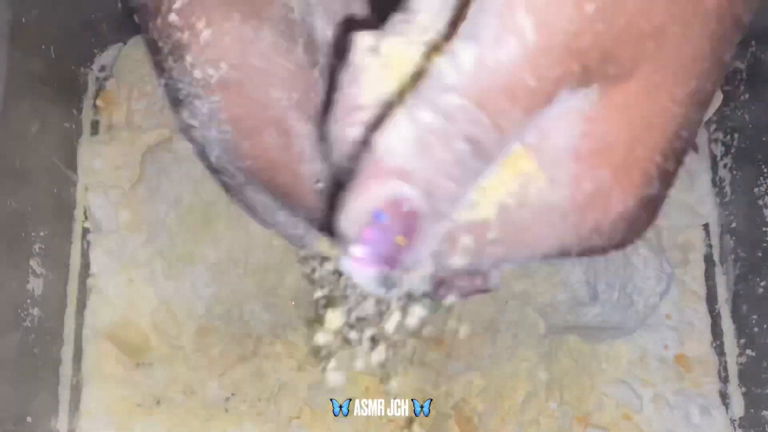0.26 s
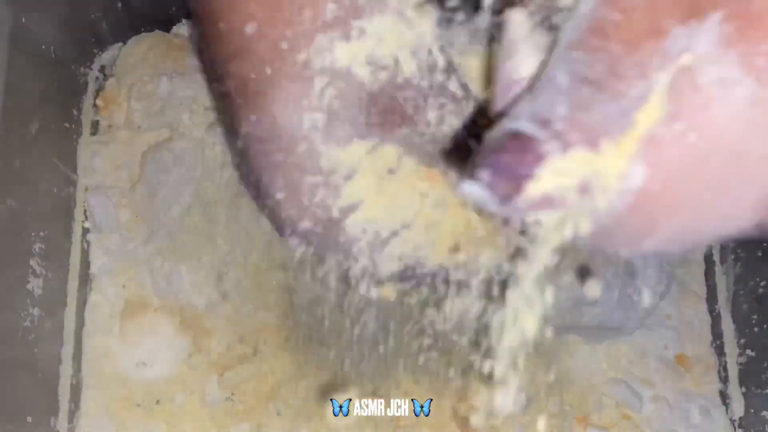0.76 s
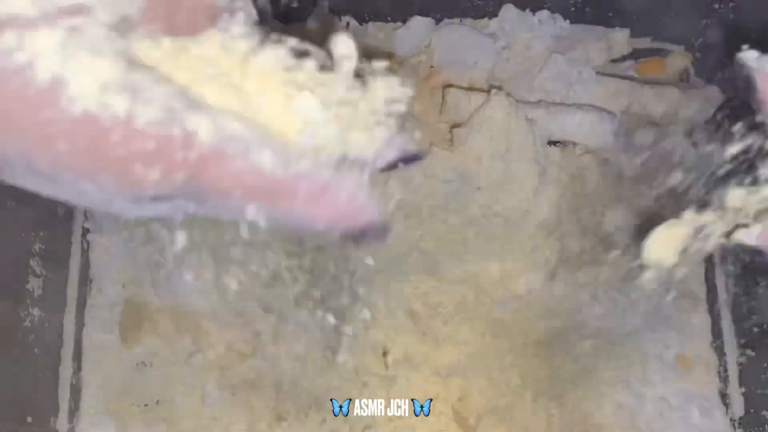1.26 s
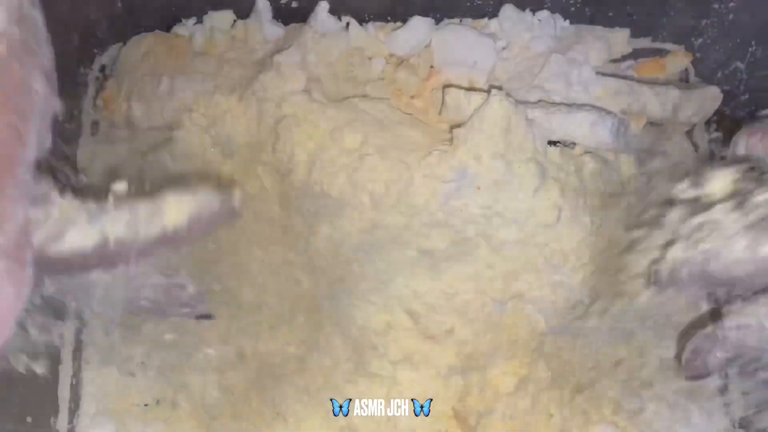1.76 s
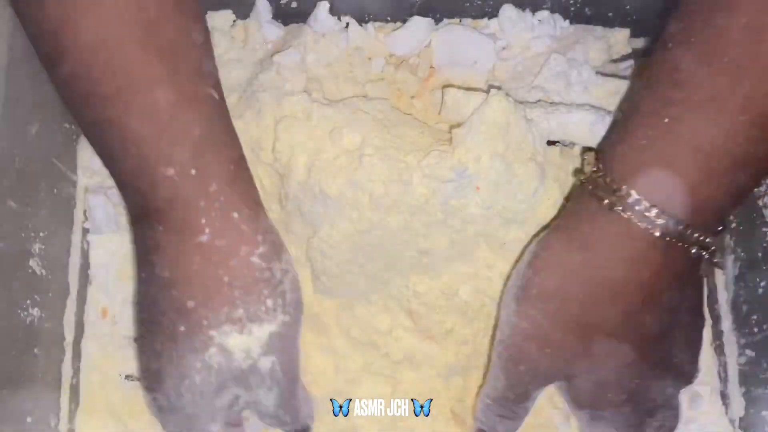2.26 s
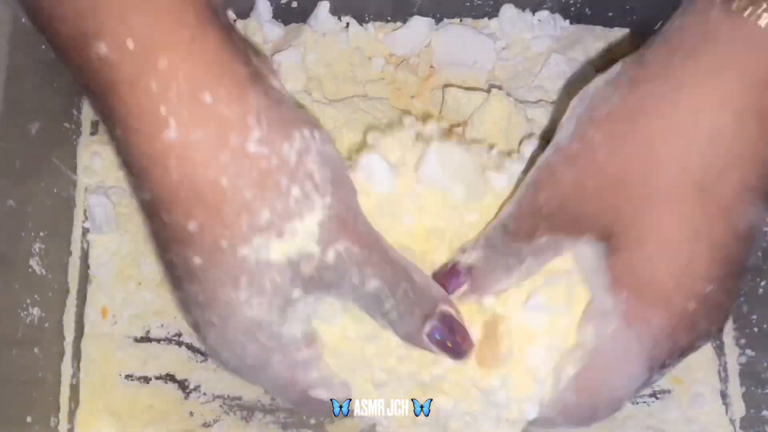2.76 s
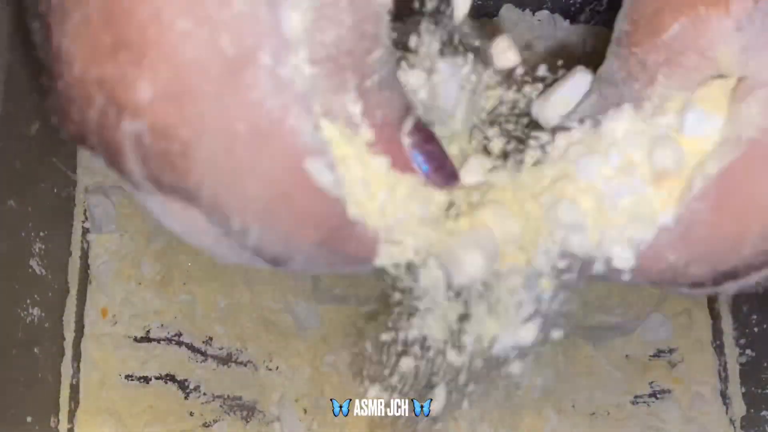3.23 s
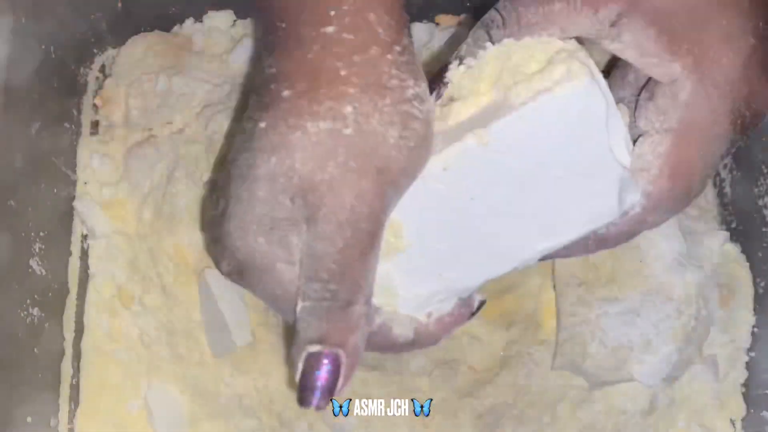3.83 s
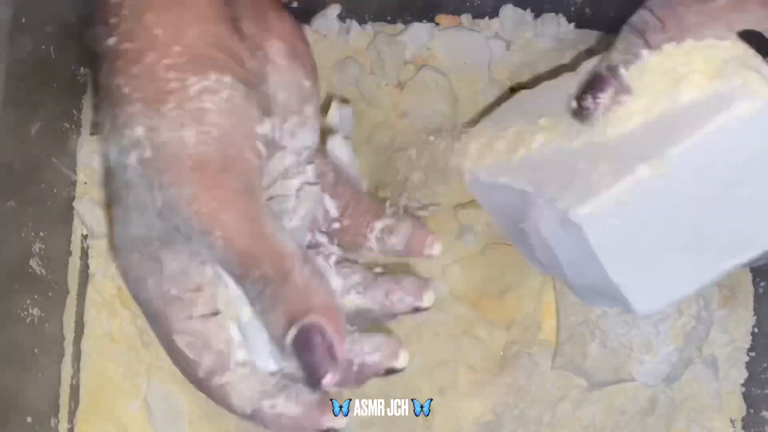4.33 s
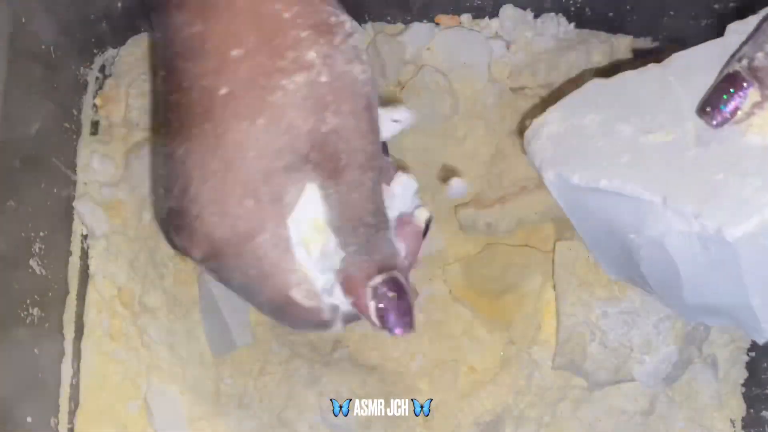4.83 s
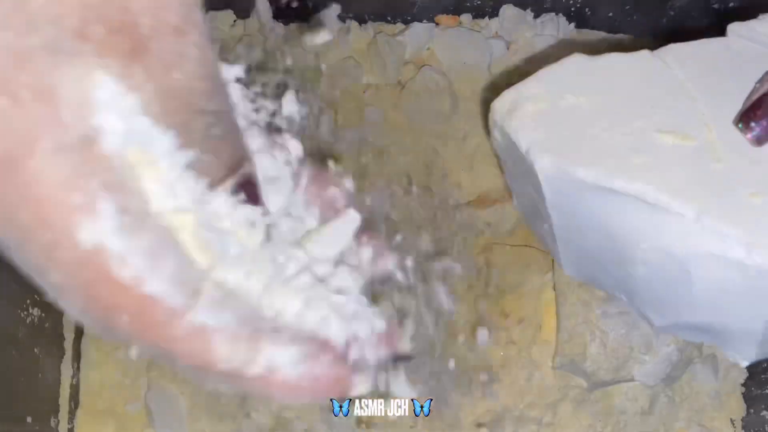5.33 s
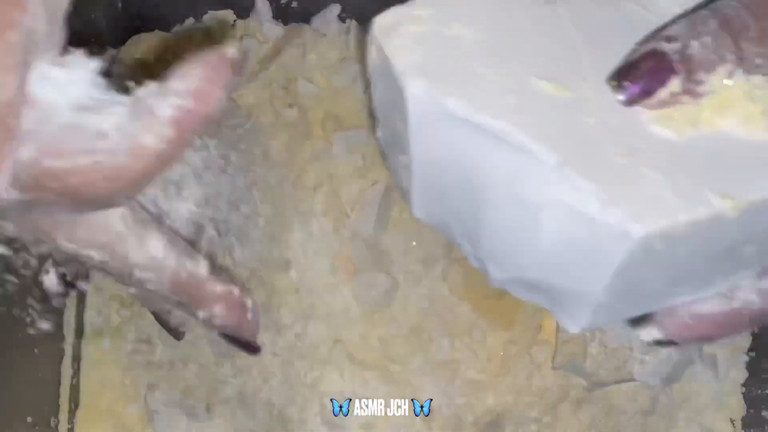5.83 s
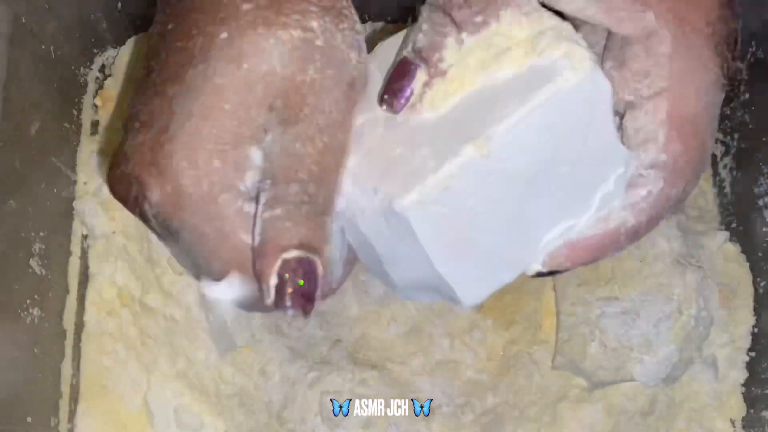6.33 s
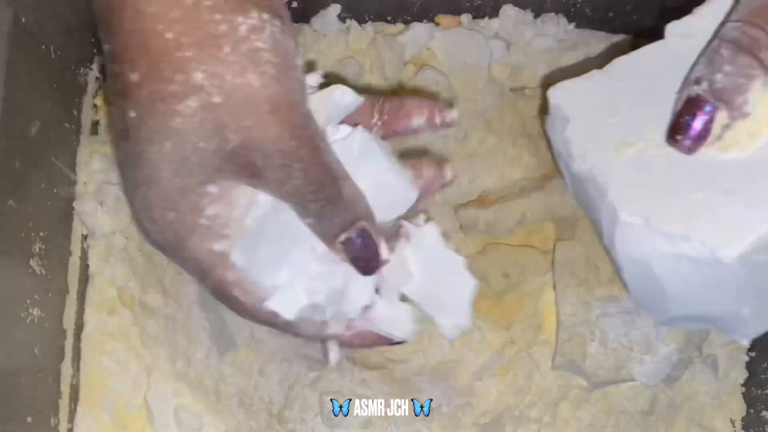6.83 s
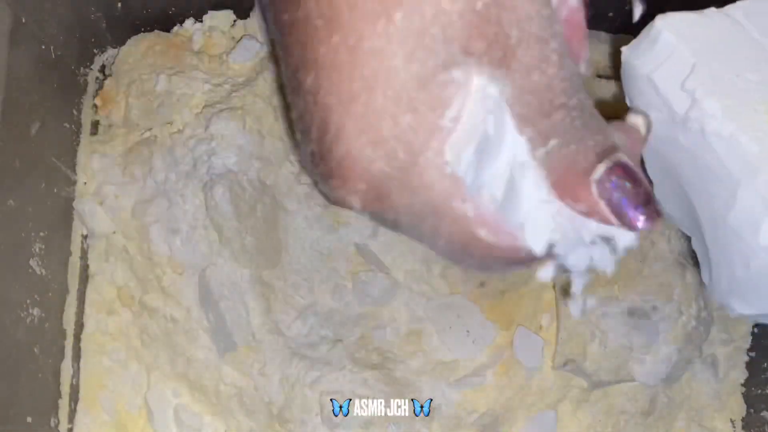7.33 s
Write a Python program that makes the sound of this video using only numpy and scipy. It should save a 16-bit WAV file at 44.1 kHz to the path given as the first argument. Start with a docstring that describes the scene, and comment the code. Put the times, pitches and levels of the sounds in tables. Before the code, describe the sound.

Close, dry, single-channel sound in a small room with faint low rumble. At 0 s a strong crunch and dull tray knocks open, then gritty squeezes until about 1.7 s, with snaps near 0.4 and 0.8 s and crumbs and powder pattering down. At 1.8 s the hands drop with a deep, short thump, then sweep the powder until about 2.7 s in a thick, dull rub with grainy hiss. A firm knock at 2.9 s leads into heavier crunches, with a sharp crack at 3.2 s. From 3.6 s it is quieter: light brittle ticks, small cracks around 4.2 s, tiny clinks and a crumbling squeeze near 5.1 to 5.6 s. At 6.05 to 6.1 s comes the loudest burst of hard, bright snaps. More splintering cracks follow at 6.6 to 6.9 s, a dull knock at 7.3 s, and small final crumbles at 7.5 s.

```python
"""A tray of loose powder in a small room, close to the microphone: two hands crush blocks of gym chalk.
Chalk snaps and crumbles (noise swarms through resonators), grit trickles (banded random ticks) and
lumps knock on the tray (noisy blows through its modes). The hands land in the powder (decaying
modes), sweep it together, then break pieces off a fresh block; a low room rumble wavers beneath."""
import sys
import numpy as np
from scipy import signal
from scipy.fft import rfft, irfft
from scipy.io import wavfile

SR = 44100
rng = np.random.default_rng(int(sys.argv[2]) if len(sys.argv) > 2 else 0)


def file_out(sig):
    """Save sig as 16-bit WAV at sys.argv[1]."""
    # one column per channel
    cols = np.atleast_2d(sig).T
    # limit, then scale
    lim = np.clip(cols, -1, 1)
    pcm = np.round(lim * 32767).astype(np.int16)
    wavfile.write(sys.argv[1], SR, pcm)


N = 334278
BURST_SAMPLES = 4096  # one short sound
ATTACK_SAMPLES = 220  # its first 5 ms


def undb(db):
    """Decibels to gain."""
    return 10 ** (np.asarray(db) / 20)


def unit(x):
    """Scale to standard deviation 1."""
    return x / (np.std(x) + 1e-12)


def curve(table, axis):
    """One column of a table, joined by straight lines in time."""
    rows = np.array(table)
    return np.interp(np.arange(N) / SR, rows[:, 0], rows[:, axis])


def add(out, start_s, x):
    """Mix a short sound in at start_s."""
    i = max(int(start_s * SR), 0)
    out[i:i + len(x)] += x[:max(N - i, 0)]


def colour(x, points):
    """Causal, minimum-phase filter with the given (frequency [Hz], gain [dB]) outline."""
    outline_hz, outline_db = np.transpose(points)
    f_hz = np.fft.rfftfreq(BURST_SAMPLES, 1 / SR) + 1
    gain = undb(np.interp(np.log(f_hz), np.log(outline_hz), outline_db))
    cepstrum = irfft(np.log(gain))
    # folding the cepstrum forward makes the response causal
    cepstrum[1:BURST_SAMPLES // 2] *= 2
    cepstrum[BURST_SAMPLES // 2 + 1:] = 0
    response = irfft(np.exp(rfft(cepstrum)))
    return signal.fftconvolve(x, response)[:len(x)]


def resonate(x, hz, q, low=False):
    """Two-pole band-pass, or low-pass for a soft contact."""
    g = np.tan(np.pi * min(hz / SR, .4))
    b = g * g * np.array([1, 2, 1]) if low else g / q * np.array([1, 0, -1])
    a = [1 + g / q + g * g, 2 * (g * g - 1), 1 - g / q + g * g]
    return signal.lfilter(b, a, x)


def walk(rate_hz):
    """Random drift through rate_hz knots a second, standard deviation 1."""
    knots = rng.standard_normal(BURST_SAMPLES)
    return unit(np.interp(np.arange(N) / SR * rate_hz, np.arange(BURST_SAMPLES), knots))


def grains(rate_hz, spread_db, size=N):
    """Random tiny impacts: many weak ones, a few strong."""
    out = np.zeros(size)
    hits = np.flatnonzero(rng.random(size) < rate_hz / SR)
    strength = undb(spread_db * np.minimum(rng.exponential(size=len(hits)), 4))
    out[hits] = strength * rng.choice([-1, 1], len(hits))
    return out


# modes of the powder-damped tray: (frequency [Hz], t60 [s], level [dB])
TRAY_MODES = [(158.4, 0.21, 11), (265.5, 0.058, 12.5), (363, 0.039, 4), (479, 0.02, 4.5), (863, 0.032, -5),
              (1484, 0.028, -3.5)]


def tray(x):
    """A blow excites the tray's exponentially decaying modes."""
    t = np.arange(BURST_SAMPLES) / SR
    response = 0
    for hz, t60_s, db in TRAY_MODES:
        decay = np.log(1000) / t60_s
        mode = np.exp(-decay * t) * np.sin(2 * np.pi * hz * t)
        response = response + undb(db) * 2 * decay / SR * mode
    return signal.fftconvolve(x, response)[:len(x)]


# rumble spectrum: (frequency [Hz], relative level [dB])
ROOM_SPECTRUM = [(20, 10), (45, 3), (90, -2), (250, -15), (450, -13), (700, -27), (2000, -59),
                 (8000, -30.5), (16000, -41)]
ROOM_DB = -47.5


def room(swell_db=1.86):
    """Low room rumble: coloured noise whose level wavers a little."""
    rumble = unit(colour(rng.standard_normal(N), ROOM_SPECTRUM))
    return rumble * undb(ROOM_DB + swell_db * walk(28))


def stroke(start_s, hold_s, attack_s, release_s):
    """Envelope of one hand movement: it builds, holds and dies away."""
    t = np.arange(N) / SR - start_s
    return np.clip(t / attack_s, 0, 1) * np.exp(-np.maximum(t - hold_s, 0) / release_s)


# fingers closing on the chalk: (time [s], hold [s], effort [dB], crackle relative to effort [dB])
SQUEEZE_STROKES = [(0,0.017,-46.5,1), (0.344,0.23,-51,5.5), (0.525,0.19,-56,0), (0.768,0.2,-53.5,6.5),
                   (0.976,0.44,-56,4), (1.376,0.27,-53.5,7), (2.556,0.12,-50,0.5), (2.71,0.24,-50.5,5.5),
                   (3.127,0.061,-49,7), (3.273,0.2,-56,5.5), (3.621,0.031,-57,-1), (3.784,0.15,-56.5,2),
                   (4.161,0.2,-53,5), (4.399,.16,-58.5,9), (4.6,0.52,-62.5,1.5), (5.121,.11,-55,8.5),
                   (5.422,.33,-56,1.5), (5.788,0.17,-54.5,-15), (6.301,0.17,-59,5), (6.509,0.11,-55.5,2.5),
                   (6.734,0.07,-53,14), (6.937,0.12,-55.5,7.5), (7.103,0.28,-58.5,6), (7.47,0.076,-57,5)]
GRIP_S, RELAX_S = 0.034, 0.048
SPILL_DB, SPILL_S = -6.5, 0.3  # powder falling on after the hand lets go
# hands pushing through the powder bed:
# (time [s], hold [s], pressure [dB], grit hiss relative to pressure [dB])
SWEEP_STROKES = [(1.799,.19,-41,-17.5), (1.88,0.23,-37.5,-3.5), (2.14,0.25,-36.5,-5), (2.403,0.27,-47,-9),
                 (2.565,0.12,-42,-10), (2.732,.5,-48,-4), (3.881,.04,-57,-3)]
PUSH_S, EASE_S = 0.035, 0.042
# loose powder in the hands: (time [s], fall relative to effort [dB])
LOOSE_POWDER = [(0,5), (1.3,-1), (3.2,-0.5), (3.9,-12.5), (5.25,4), (5.9,-9), (7.58,-2.5)]
HAND_RUB_DB = -4  # rubbing in the hands, relative to fall
REST_DB, REST_CRACKLE_DB = -64.5, 2  # chalk shifting in the resting hands


def hands():
    """Squeezes and sweeps add power to grit flow, bed pressure, crumb grinding and fall, in dB."""
    effort = np.full(N, undb(REST_DB) ** 2)
    grind = effort * undb(REST_CRACKLE_DB) ** 2
    loose = undb(curve(LOOSE_POWDER, axis=1))
    for s, hold_s, db, crackle_db in SQUEEZE_STROKES:
        grip = (undb(db) * stroke(s, hold_s, GRIP_S, RELAX_S)) ** 2
        spill_gain = undb(db + SPILL_DB) * np.minimum(loose, 1)
        spill = (spill_gain * stroke(s, hold_s, GRIP_S, SPILL_S)) ** 2
        effort = effort + grip + spill
        grind = grind + (grip + spill) * undb(crackle_db) ** 2
    flow = effort
    fall = effort * loose ** 2
    press = fall * undb(HAND_RUB_DB) ** 2
    for s, hold_s, db, hiss_db in SWEEP_STROKES:
        push = (undb(db) * stroke(s, hold_s, PUSH_S, EASE_S)) ** 2
        press = press + push
        flow = flow + push * undb(hiss_db) ** 2
    return 10 * np.log10([flow, press, grind, fall])


# grit and dull rubbing spectra: (frequency [Hz], relative level [dB])
GRIT_SPECTRUM = [(300, 14), (900, -3.5), (1800, 4.5), (3000, 7), (8000, 2), (12000, -3.5), (16000, -9.5)]
RUB_SPECTRUM = [(40, -3.5), (240, 1), (490, -1), (670, -9), (1350, -5.5), (2200, -13.5), (5000, -21.5),
                (12000, -54)]
# hollow under the sweeping hands lifts one hiss band: (time [s], frequency [Hz], lift [dB])
HOLLOW_LIFT = [(1.97,10600,-2), (2.04,7750,8), (2.2,5800,8), (2.27,3030,4), (2.36,5560,-1), (2.43,5560,7.5)]


def powder(flow_db, press_db, grit_db=-1.1, rub_db=-1, grit_flicker_db=2.0, rub_flicker_db=3.0,
           slip_db=1.7, drift_db=1.5, hollow_octaves=0.6):
    """Fine grit hisses as it slides and falls; the packed bed rubs dully under the hands."""
    slips_db = slip_db * walk(45)  # the bed gives way in small jerks
    # a stronger flow has more grains, so it sounds smoother
    grain_hz = 600 * undb((flow_db - flow_db.mean()) * .6)
    hollow_hz, hollow_db = curve(HOLLOW_LIFT, axis=1), curve(HOLLOW_LIFT, axis=2)
    grit = 0
    for hz in 500 * 1.25 ** np.arange(16):
        # every grain size ticks in its own band and surges on its own
        lift_db = hollow_db * np.exp(-(np.log2(hz / hollow_hz) / hollow_octaves) ** 2)
        surge = undb(drift_db * walk(16) + lift_db)
        grit = grit + surge * resonate(grains(grain_hz, 4), hz, 2.2)
    grit = unit(colour(grit, GRIT_SPECTRUM) / np.sqrt(grain_hz))
    grit = grit * undb(flow_db + grit_db + slips_db + grit_flicker_db * walk(200))
    # light pressure moves single clods, firm pressure drags the whole bed
    clod_hz = 1000 * undb((press_db - press_db.mean()) * .7)
    rub = unit(colour(grains(clod_hz, 3.5) / np.sqrt(clod_hz), RUB_SPECTRUM))
    return grit + rub * undb(press_db + rub_db + slips_db + rub_flicker_db * walk(70))


def crumbs(level_db, hz, rate_hz, spread_db, octaves, q=0.91, clump_db=4, tail_s=0.00099, tail_db=-19):
    """Crumbs give way in clusters, in ten size bands pitched around hz."""
    out, t = 0, np.arange(ATTACK_SAMPLES) / SR
    cluster = undb(clump_db * walk(28))
    for centre_hz in hz * 2 ** (octaves * np.linspace(-1, 1, 10)):
        tail = rng.standard_normal(ATTACK_SAMPLES) * np.exp(-t / tail_s)
        burst = (t == 0) + undb(tail_db) * tail
        breaks = signal.fftconvolve(grains(rate_hz * cluster, spread_db), burst)[:N]
        out = out + unit(resonate(resonate(breaks, centre_hz, q), centre_hz, q / 2))
    return unit(out) * undb(level_db)


# chalk spectrum: (frequency [Hz], relative level [dB])
CHALK_SPECTRUM = [(30, 11), (200, 9.5), (450, 8.5), (900, 1), (3000, -4), (10000, -3), (12500, -12),
                  (16000, -44)]


def crackle(grind_db):
    """Crumbs breaking between the fingers, coloured as chalk."""
    breaks = crumbs(grind_db + 2, hz=3960, rate_hz=30, spread_db=5.4, octaves=1.17)
    return colour(breaks, CHALK_SPECTRUM)


def patter(fall_db):
    """Crumbs landing on the soft bed, pitched low."""
    return crumbs(fall_db - 1.5, hz=536, rate_hz=9, spread_db=6.5, octaves=1.62)


# chalk breaking: (time [s], level [dB], brightness [Hz], crumbling relative to its own sharp break [dB])
CHALK_SNAPS = [(0.022,-24,1634,18), (0.4121,-31.5,2480,29.5), (0.7082,-35,3460,20), (0.7954,-36,7360,-26),
               (0.8078,-25,1840,22), (1.261,-36,3220,-20), (1.655,-32.5,1870,2), (2.587,-33.5,1800,-6),
               (2.747,-42,5530,-1), (2.8608,-30.5,1840,9), (3.0412,-29,1920,7), (3.1997,-24,1650,6),
               (3.22,-29,1930,-13), (3.458,-29.5,1900,0), (3.666,-35.5,2500,35), (3.8636,-34,3420,-8),
               (4.178,-37,2170,19), (4.1908,-34,2617,18), (4.2213,-36,4470,2), (4.266,-32.5,4460,27),
               (4.309,-32.5,2970,7), (4.427,-43,3660,-8), (4.5068,-38,3400,3), (4.554,-42,4460,0),
               (4.8793,-43,4170,-10), (4.951,-44.5,2680,11), (5.053,-31.5,2630,20), (5.2267,-38,3940,-6),
               (5.277,-39,2180,8), (5.468,-32.5,2966,0), (5.7205,-38.5,3550,-4), (6.0436,-23.5,3500,15),
               (6.0472,-36,3660,11), (6.0755,-19.5,3130,12), (6.081,-20,2830,-2), (6.0933,-22.5,2320,32),
               (6.097,-15.5,2410,7), (6.2978,-36,2360,-5), (6.5923,-31.5,3400,-2), (6.6586,-23,5200,-6),
               (6.6897,-23.5,2900,10), (6.716,-32,5800,-15), (6.7783,-28.5,1945,-13), (6.794,-26,2960,-11),
               (6.803,-31,3860,10), (6.8117,-36,3840,1), (6.816,-39,5500,9.5), (6.865,-26.5,2920,32),
               (7.0478,-38,3573,15), (7.509,-39.5,2220,-2), (7.519,-35,1708,4)]


def snaps(crumble_s=0.002, run_up_s=0.00062, run_up_db=-4, settle_s=0.012, settle_db=-22, q=0.89,
          tray_db=-9, dull=4, piece_db=-4, piece_q=6, hand_hz=370, hand_db=-3):
    """Small fractures run up to one sharp break; a swarm of them follows and dies out."""
    out, t = np.zeros(N), (np.arange(BURST_SAMPLES) - ATTACK_SAMPLES) / SR
    after = np.exp(-abs(t) / crumble_s) + undb(settle_db) * np.exp(-abs(t) / settle_s)
    activity = np.where(t < 0, undb(run_up_db) * np.exp(-abs(t) / run_up_s), after)
    for s, db, hz, crumble_db in CHALK_SNAPS:
        swarm = grains(16000, 1.0, size=BURST_SAMPLES) * activity
        force = undb(crumble_db) * swarm / np.linalg.norm(swarm)
        force[ATTACK_SAMPLES] = -1
        # a bigger piece breaks more slowly, so it sounds lower and duller
        x = resonate(resonate(force, hz, q), dull * hz, 0.94, low=True)
        x = colour(x, CHALK_SPECTRUM)
        # each piece has its own heavily damped modes
        octaves = rng.uniform(-1.14, 1, size=3)
        x = x + undb(piece_db) * sum(resonate(x, hz * 2 ** octave, piece_q) for octave in octaves)
        # the tray and the cupped hand give it body
        x = x + undb(tray_db) * tray(x) + undb(hand_db) * resonate(force, hand_hz, 1.4)
        x = x * np.sqrt(ATTACK_SAMPLES) / np.linalg.norm(x)
        add(out, s - ATTACK_SAMPLES / SR, undb(db) * x)
    return out


# lumps and fingers striking the tray: (time [s], level [dB], contact brightness [Hz])
TRAY_KNOCKS = [(0.0276,-25,278.5), (0.0448,-20.5,567), (0.0472,-20.5,1100), (0.087,-31,425.5),
               (0.13,-34.5,944), (.639,-26,1258), (0.8156,-31.5,1413), (0.8945,-37,686), (0.9608,-28,1090),
               (1.453,-35,1100), (1.838,-15.5,1080), (2.6114,-25.5,1580), (2.867,-17,1030),
               (3.2216,-29.5,680), (3.55,-30,490), (5.035,-38,875), (5.205,-36,480), (5.572,-37,420),
               (5.586,-31,754), (7.2966,-26,577), (7.335,-36,400)]


def knocks(tray_db=2, dust_db=-25, dust_s=0.0013, crush_db=-2, crush_s=0.0028):
    """A lump flattens as it lands, pushes the tray and sheds a puff of grit."""
    out, t = np.zeros(N), (np.arange(BURST_SAMPLES) - ATTACK_SAMPLES) / SR
    for s, db, hz in TRAY_KNOCKS:
        crush = rng.standard_normal(BURST_SAMPLES) * np.exp(-abs(t) / crush_s) * (t > 0)
        force = undb(crush_db) * crush / np.linalg.norm(crush) - (t == 0)
        push = resonate(resonate(force, hz, 1.2), 2 * hz, .7, low=True)
        x = push + undb(tray_db) * tray(push)
        x = x * np.sqrt(ATTACK_SAMPLES) / np.linalg.norm(x)
        dust = unit(colour(grains(5000, 4, size=BURST_SAMPLES), GRIT_SPECTRUM))
        dust = dust * np.exp(-abs(t) / dust_s) * (t > 0)
        add(out, s - ATTACK_SAMPLES / SR, undb(db) * (x + undb(dust_db) * dust))
    return out


# clods collapsing under the fingers: (time [s], level [dB], brightness [Hz], length [s])
CLOD_SCUFFS = [(0.45,-38.5,424,0.023), (1.739,-34.5,570,0.022), (1.825,-29,364,0.045),
               (1.946,-33,785,0.036), (2.517,-36,387,0.024), (2.582,-35.5,1680,0.058),
               (2.888,-27,550,0.014)]


def scuffs(q=1.07, rise_s=0.0036, tray_db=-6, dust_db=-13):
    """A clod collapses under the fingers in a rough, dull swarm of small slips."""
    out, t = np.zeros(N), np.arange(2 * BURST_SAMPLES) / SR
    for s, db, hz, length_s in CLOD_SCUFFS:
        envelope = np.minimum(t / rise_s, 1) * np.exp(-(t / length_s) ** 2)
        slips = grains(2500, 3, size=len(t)) * envelope
        body = resonate(resonate(slips, hz, q), 2 * hz, 0.62, low=True)
        dust = unit(colour(slips, GRIT_SPECTRUM))
        x = unit(body + undb(tray_db) * tray(body)) + undb(dust_db) * dust
        add(out, s, undb(db) * x * np.sqrt(length_s * SR) / np.linalg.norm(x))
    return out


def rings(table):
    """Blows that each sound a single exponentially decaying mode."""
    out, t = np.zeros(N), np.arange(SR // 2) / SR
    for s, db, hz, t60_s in table:
        mode = np.sin(2 * np.pi * hz * t) * undb(-60 * t / t60_s)
        add(out, s, undb(db) * mode)
    return out


# hands bumping powder bed, tray and block: (time [s], level [dB], frequency [Hz], t60 [s])
HAND_THUMPS = [(1.724, -22, 63.7, 0.25), (1.824, -18, 60.8, 0.51), (1.831, -10.5, 102, 0.075),
               (1.837, -15, 856, 0.043), (5.236, -34, 110, 0.18), (6.092, -18.5, 105.9, 0.033),
               (7.297, -22, 340, 0.04)]


def thumps():
    """Bumps of the hands, one damped mode each."""
    return rings(HAND_THUMPS)


# hard bits ringing briefly: (time [s], level [dB], frequency [Hz], t60 [s])
HARD_CLINKS = [(4.037, -42, 3060, 0.058), (4.06, -44.5, 2340, 0.072), (4.813, -27.5, 3940, 0.016),
               (4.88, -30, 3520, 0.014), (5.467, -30, 2575, 0.062), (5.586, -23, 1100, 0.03)]


def clinks():
    """Hard bits, one short mode each."""
    return rings(HARD_CLINKS)


def reflections(x, wet_db=-24, decay_s=0.032):
    """A faint, short echo of the small room: decaying noise from 4 ms on."""
    t = np.arange(2 * BURST_SAMPLES) / SR
    noise = resonate(rng.standard_normal(len(t)), 9600, 1.0, low=True)
    response = noise * np.exp(-t / decay_s) * (t > .004)
    return undb(wet_db) * signal.fftconvolve(x, response / np.linalg.norm(response))[:N]


def scene():
    """All the chalk sounds in the room, on one channel."""
    flow_db, press_db, grind_db, fall_db = hands()
    chalk = powder(flow_db, press_db) + crackle(grind_db) + patter(fall_db)
    chalk = chalk + snaps() + knocks() + scuffs() + thumps() + clinks()
    return (chalk + reflections(chalk) + room())[None]


def record(dry):
    """The recorder rounds the sharpest peaks and cuts the top above 16 kHz."""
    rounded = .6 * np.tanh(dry / .6)
    top_cut = signal.ellip(8, .2, 70, 16000, fs=SR, output="sos")
    return signal.sosfilt(top_cut, rounded)


dry = scene()
out = record(dry)
file_out(out)
```